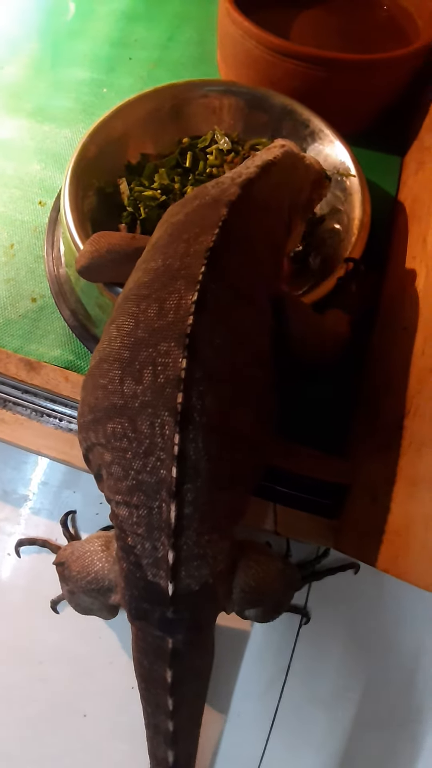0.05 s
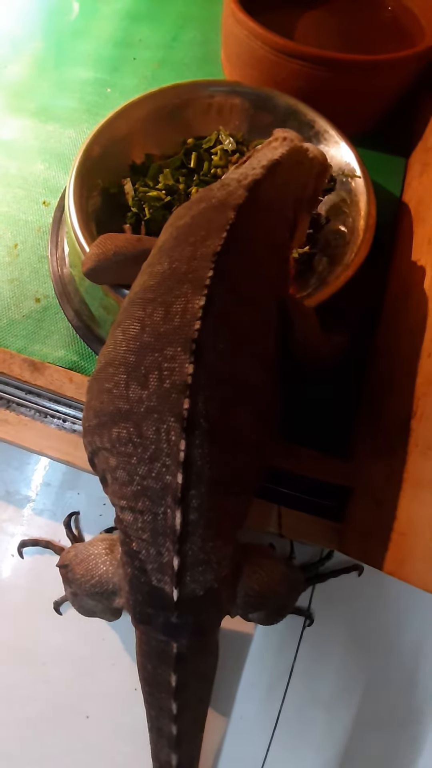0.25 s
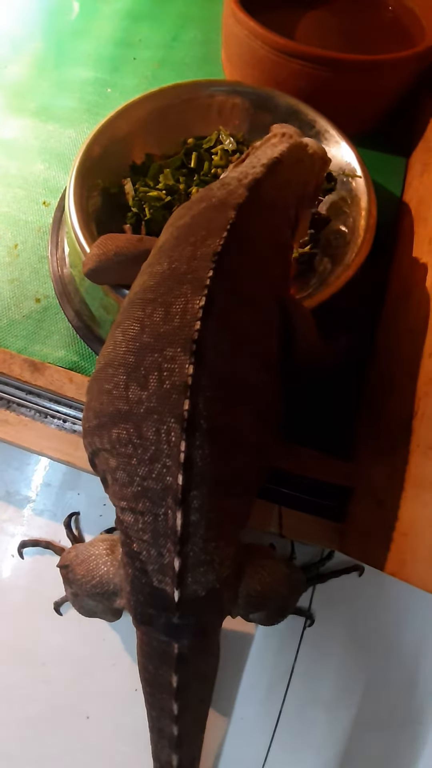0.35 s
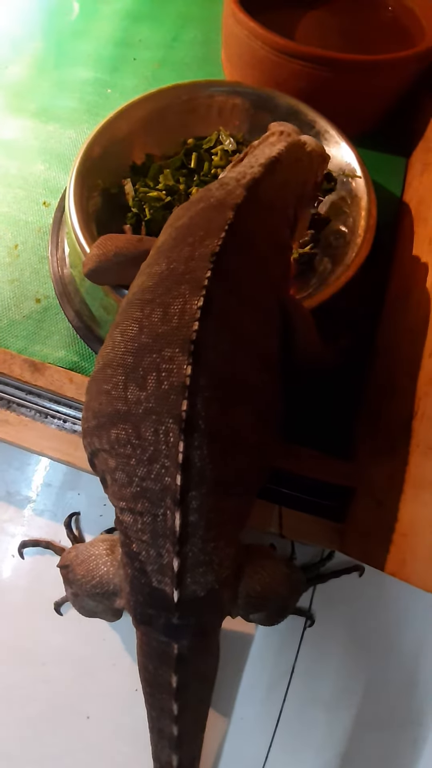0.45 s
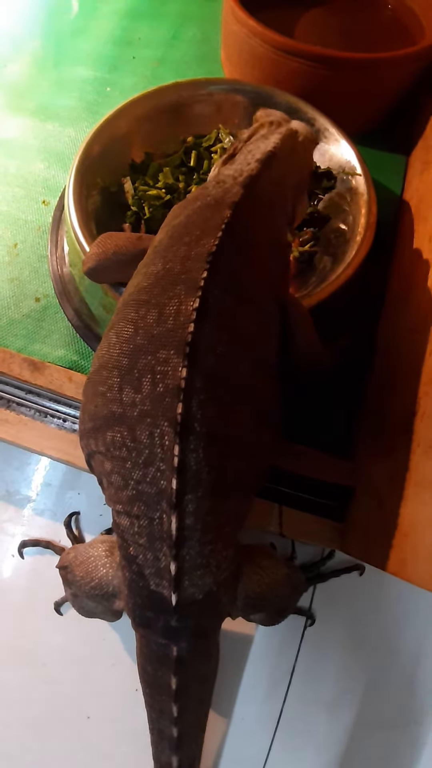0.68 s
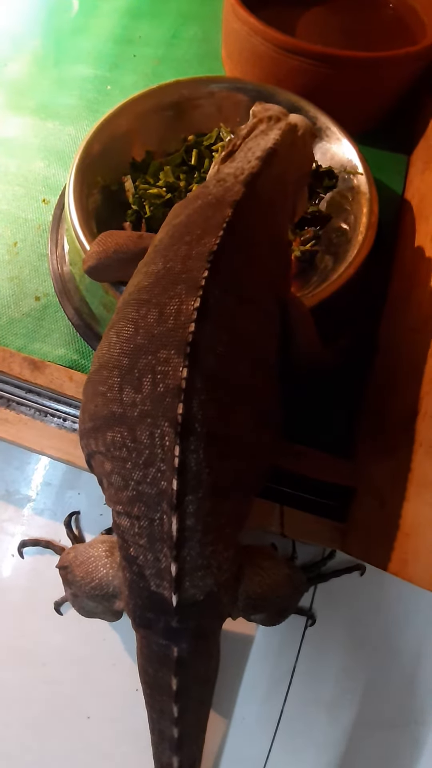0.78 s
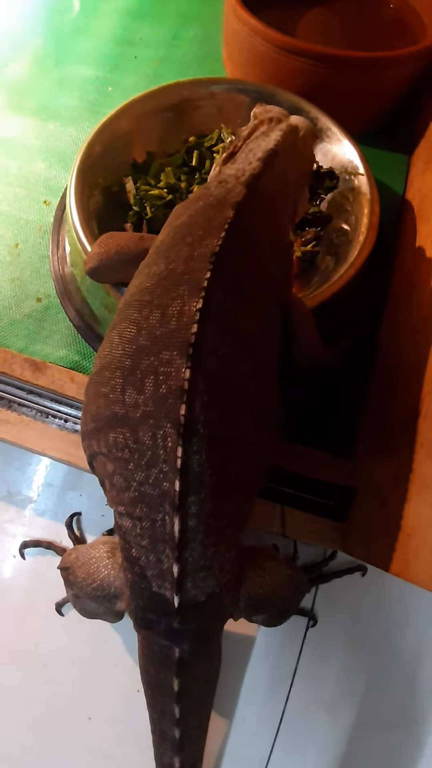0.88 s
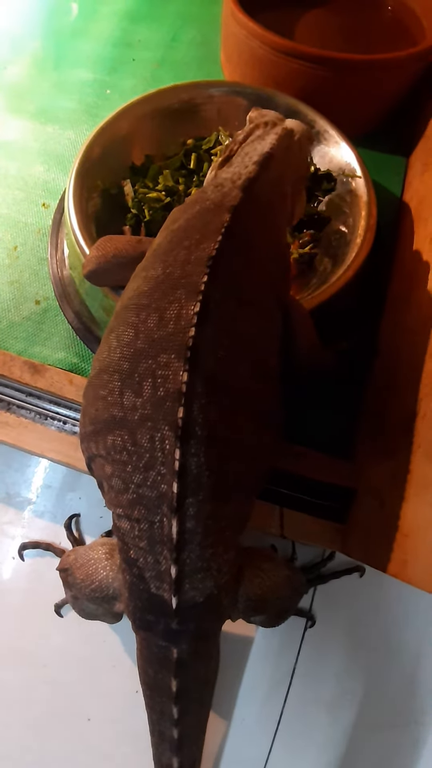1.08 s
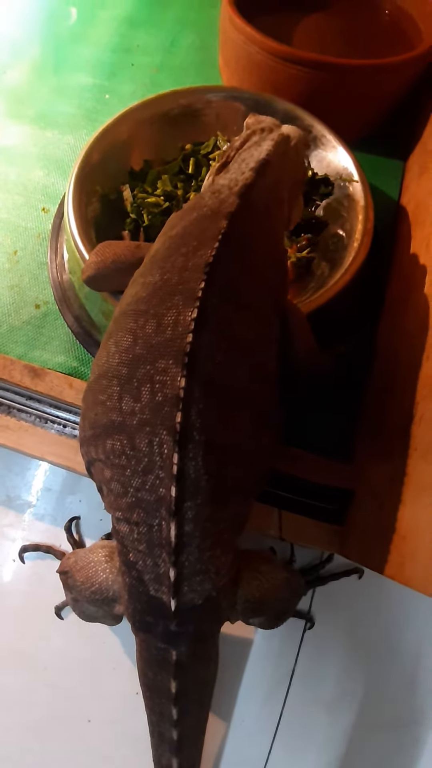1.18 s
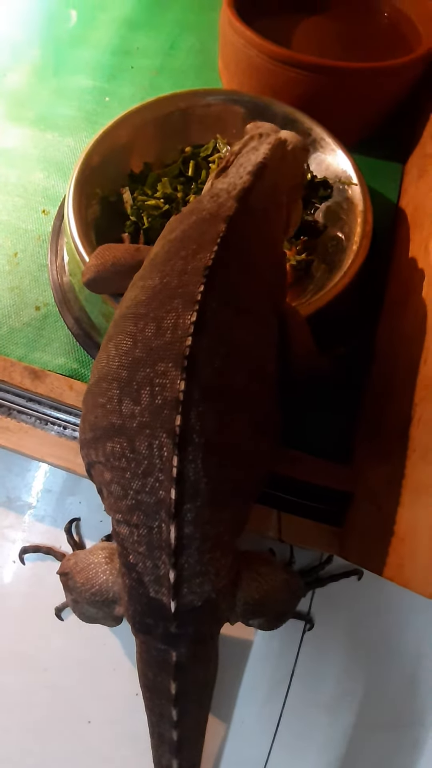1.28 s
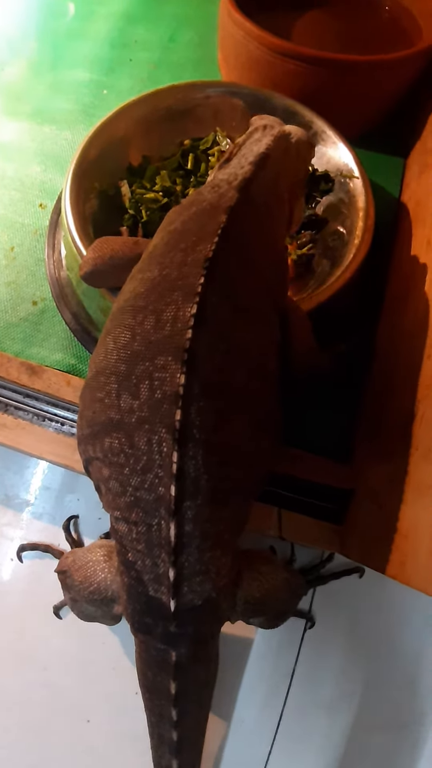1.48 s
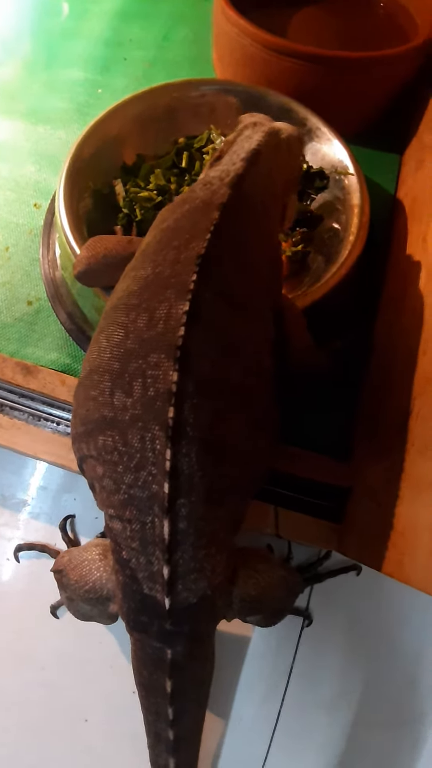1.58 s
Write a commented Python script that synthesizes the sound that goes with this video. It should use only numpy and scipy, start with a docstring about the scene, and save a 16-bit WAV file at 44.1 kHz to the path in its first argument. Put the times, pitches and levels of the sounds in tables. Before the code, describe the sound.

A lizard crunches leafy greens in a metal bowl, one dry bite in a quiet room.

```python
"""Iguana feeding from a steel bowl

Chopped greens, small quiet room. One bite swells as a tearing rustle and ends in two snaps
that ring the bowl; a bright rustle tail, a tick and soft chewing follow. Rustle, snaps and crunches
are showers of tiny fractures. Small clicks and knocks throughout, a thin high hiss at the start.
Behind them: room air, low hum, a dull drone, a faint far whine.
The right microphone hears much less treble than the left."""
import sys
import numpy as np
from scipy import signal
from scipy.fft import rfft, irfft, next_fast_len
from scipy.io import wavfile
from scipy.ndimage import uniform_filter1d

SR = 44100
rng = np.random.default_rng(int(sys.argv[2]) if len(sys.argv) > 2 else 0)


def generate_wav(signal):
    """Clip the signal to [-1, 1] and save it as 16-bit WAV at the path in sys.argv[1]."""
    frames = np.transpose(np.atleast_2d(signal))
    scaled = np.clip(frames, -1, 1) * 32767
    pcm = np.round(scaled).astype(np.int16)
    wavfile.write(sys.argv[1], SR, pcm)


N = 72765

# room air spectrum: f/Hz, gain/dB
AIR_COLOUR = [(25, -26), (39, -25.5), (48, -7), (85, 0), (130, 4), (220, -5), (270, -2.5), (480, -14.5),
              (900, -23.5), (1500, -25), (4000, -32), (7000, -34.5), (9800, -44), (13000, -29.5),
              (16000, -33.5)]
# room hums: f/Hz, half-width/oct, mid-scene level/dB
ROOM_HUMS = [(56.28, 0.21, -68), (164.6, 0.11, -69)]
# drone envelope: t/s, level/dB
DRONE_ENVELOPE = [(0, -54.5), (.1, -67.5), (.16, -72.5), (.5, -80.5), (.95, -77), (1.1, -68.5), (1.25, -72),
                  (1.43, -66.5), (1.55, -83), (1.65, -77.5)]
# small clicks and knocks, thin high hiss, bright rustle tail:
# t/s, level/dB, f/Hz, half-width/oct, decay/s, left-right/dB
SMALL_SOUNDS = [(.001, -59.5, 14100, 0.45, 0.022, 0), (0.0149, -51.5, 960, 0.17, 0.00099, 1),
                (0.014, -52, 421, 0.25, 0.0029, 9), (0.012, -65, 8200, .05, 0.079, 7),
                (.064, -65.5, 790, 0.36, 0.013, 10), (0.068, -79.5, 2370, .17, 0.15, -26),
                (.17, -66.5, 8100, .05, .004, -25), (.187, -65, 8400, .05, 0.0056, -2),
                (.203, -58, 380, .3, 0.0076, 11.5), (.211, -62, 1000, 0.47, 0.0022, 2.5),
                (0.216, -50, 8380, .09, .005, -1), (0.309, -51.5, 13440, .22, 0.058, 1.5),
                (0.37, -59.5, 12640, .3, 0.001053, 4), (0.378, -58.5, 2257, .35, 0.043, -3),
                (.38, -66.5, 4340, .25, 0.0119, -8), (0.525, -73, 12000, .5, .001, 3),
                (0.578, -57, 2110, 0.25, 0.0018, -2.5), (.579, -59.5, 1002, 0.56, .008, 3.5),
                (.595, -75, 8000, .6, 0.016, 10), (.69, -72.5, 7600, .12, 0.0247, 0),
                (0.989, -83, 7000, 0.52, .003, -1), (1.04, -76.5, 12000, 0.42, 0.0044, 0),
                (1.177, -75, 3800, .7, 0.0097, -2.5), (1.27, -67, 8000, 0.71, 0.014, -3),
                (1.32, -70, 7700, .15, 0.019, 2.5), (1.352, -63, 9500, .55, 0.0031, 0.5),
                (1.373, -70.5, 4500, 1.1, .005, -1)]
# tearing rustle: t/s, level/dB, lower edge f/Hz
TEAR_TRACK = [(.17, -84, 8000), (0.198, -70, 8000), (.218, -47.5, 7600), (0.231, -40, 3830),
              (0.243, -36.5, 2000), (.258, -36, 1495), (.272, -34.5, 1800), (.29, -49.5, 1200),
              (0.311, -59, 1200), (.34, -82.5, 1200)]
# rustle spectrum: f/Hz, gain/dB
RUSTLE_COLOUR = [(200, -18), (340, -7.5), (650, -15), (950, -7.5), (1500, -9), (2500, -6), (4300, -0.5),
                 (6000, -4.5), (7600, -4), (8550, 3.5), (9500, -18), (16000, -21.5)]
# stalk snaps: t/s, level/dB, decay/s
STALK_SNAPS = [(0.2452, -36.5, 0.0023), (0.2468, -30, 0.00058), (0.2616, -24.5, .002),
               (0.2637, -26.5, .003), (0.2909, -44.5, 0.0032), (0.305, -49.5, 0.00073)]
# snap spectrum: f/Hz, gain/dB
STALK_COLOUR = [(100, -42), (240, -24), (330, -8), (450, -8), (650, -14.5), (920, -7), (1600, -11),
                (2600, -9), (3400, -7), (4450, 2), (5900, -6.5), (7600, -3.5), (8600, 6), (9500, -14),
                (12500, -8.5), (16000, -17.5)]
# modes of the food-damped bowl: f/Hz, relative level/dB, t60/s
BOWL_MODES = [(312, -8, .12), (1410, -8, .14), (1880, -9, .3), (2540, -9, .3), (3100, -8, .12),
              (3830, -2, .13), (4190, -3, .13), (4470, 3, .07), (6640, -5, .1), (8675, 6, .07)]
# far whine: t/s, f/Hz, tone level/dB, hiss level/dB
WHINE_TRACK = [(.38, 755, -80.5, -85), (.42, 758.2, -76.5, -80), (.46, 749, -69, -80.5),
               (.485, 746.5, -84, -75), (0.531, 761, -69, -75.5), (.6, 734, -69.5, -70),
               (.73, 752, -76.5, -79.5), (0.771, 748, -92, -76), (0.849, 596, -74, -72),
               (.94, 620.5, -85, -73), (1.0, 618, -96, -89)]
# tick spectrum: f/Hz, gain/dB
CONTACT_COLOUR = [(600, -67.5), (2400, -36.5), (4400, -28.5), (6100, -29), (7500, -16), (10500, -19),
                  (12000, -5), (13300, 5.5), (15000, -10.5), (16500, -2.5)]
# chewing crunches: t/s, level/dB, decay/s
CHEW_CRUNCHES = [(.7746, -56, 0.00083), (0.785, -59.5, .005), (0.7908, -52, 0.00078),
                 (0.7951, -46.5, 0.0012), (.803, -55, 0.0042)]
# crunch spectrum: f/Hz, gain/dB
CHEW_COLOUR = [(150, -29), (300, -8.5), (550, -1), (900, -5), (1150, -4.5), (1550, 2.5), (2500, -12),
               (4000, -6.5), (5500, -6.5), (7500, -9), (9500, -27.5), (16000, -27)]
# right microphone relative to left: f/Hz, gain/dB
RIGHT_MIC_COLOUR = [(100, 2.5), (400, -1.5), (1300, 2.5), (2400, 2.5), (4400, 0.5), (6300, -11.5),
                    (8200, -25.5), (15000, -23)]

t = np.arange(N) / SR


def amp(db):
    return 10 ** (np.asarray(db) / 20)


def unit(x):
    """Scale to rms 1."""
    return x / np.sqrt(np.mean(x ** 2) + 1e-30)


def impulse_level(x, db):
    """Give a short sound the energy of 5 ms at this level."""
    return unit(x) * amp(db) * np.sqrt(.005 * SR / N)


def pan(left_right_db):
    return amp(np.array([[left_right_db], [-left_right_db]]) / 2)


def shape(x, gain_db):
    """Minimum-phase filter; gain_db is a function of octaves above 1 Hz."""
    size = 2 * next_fast_len(N)
    octave = np.log2(np.maximum(np.fft.rfftfreq(size, 1 / SR), 1))
    cepstrum = irfft(np.log(amp(gain_db(octave))))
    cepstrum[1:size // 2] *= 2
    cepstrum[size // 2 + 1:] = 0
    return irfft(rfft(x, size) * np.exp(rfft(cepstrum)))[..., :N]


def tint(x, colour):
    """Filter by (f/Hz, gain/dB) points."""
    hz, db = np.array(colour, float).T
    return shape(x, lambda octave: np.interp(octave, np.log2(hz), db))


def band(x, hz, half_width_oct):
    """One resonance with steep skirts."""
    return shape(x, lambda octave: -30 * np.log10(1 + ((octave - np.log2(hz)) / half_width_oct) ** 2 / 3))


def noise():
    return rng.standard_normal(N)


def wander(rate_hz):
    """Smooth random drift, rms 1."""
    hold = int(SR / rate_hz)
    steps = np.repeat(rng.standard_normal(N // hold + 1), hold)
    return unit(uniform_filter1d(steps, hold)[:N])


def fractures(per_s, scatter_db):
    """Random impulses of uneven size."""
    hits = rng.random(N) < per_s / SR
    return hits * np.sign(noise()) * amp(scatter_db * noise())


def burst(start_s, decay_s):
    """A first break, then a dying shower of fractures."""
    age_s = t - start_s
    shower = fractures(per_s=17000, scatter_db=.5) * (age_s >= 0) * np.exp(-np.abs(age_s) / decay_s)
    shower[np.searchsorted(age_s, 0)] = 1
    return shower


def background(air_db=-67, wide_above_hz=450, hum_fall_db_per_s=5):
    """Room air, near mono in the bass; ebbing low hums; a dull drone that comes and goes."""
    side = shape(noise(), lambda octave: -10 * np.log10(1 + (wide_above_hz / 2 ** octave) ** 2))
    spread = np.array([side, -side])
    air = unit(tint(noise() + spread, AIR_COLOUR)) * amp(air_db)
    hums = sum(unit(band(noise(), hz, width_oct)) * amp(db) for hz, width_oct, db in ROOM_HUMS)
    hums *= amp(-hum_fall_db_per_s * (t - t.mean()))
    drone = unit(band(noise() + spread, hz=371.5, half_width_oct=.18))
    drone *= amp(np.interp(t, *np.array(DRONE_ENVELOPE).T))
    return air + hums + drone


def small_sounds():
    """Small clicks and knocks, a thin high hiss, a bright rustle tail: one panned band burst each."""
    return sum(impulse_level(band(burst(start_s, decay_s), hz, width_oct), db) * pan(side_db)
               for start_s, db, hz, width_oct, decay_s, side_db in SMALL_SOUNDS)


def leaf_tear(edge_db_per_oct=22.5):
    """Leaf fibres break in a rustle that spreads down from the treble."""
    times_s, level_db, edge_hz = np.array(TEAR_TRACK).T
    edge_oct = np.interp(t, times_s, np.log2(edge_hz))
    fibres = unit(tint(fractures(per_s=3800, scatter_db=5.5), RUSTLE_COLOUR))
    bin_hz, frame_s, frames = signal.stft(fibres, SR, nperseg=256)
    below_edge_oct = np.maximum(np.interp(frame_s, t, edge_oct) - np.log2(bin_hz + 1)[:, None], 0)
    rustle = signal.istft(frames * amp(-edge_db_per_oct * below_edge_oct), SR)[1][:N]
    gate = (t > times_s[0]) * (t < times_s[-1])
    return rustle * amp(np.interp(t, times_s, level_db)) * gate


def stalk_snaps():
    """Stalks break in short, bright bursts."""
    return sum(impulse_level(tint(burst(start_s, decay_s), STALK_COLOUR), db)
               for start_s, db, decay_s in STALK_SNAPS)


def bowl_ring(bite, relative_db=-10.5):
    """The bite drives the steel bowl's damped modes."""
    ring = np.zeros(N)
    for hz, db, t60_s in BOWL_MODES:
        mode = np.sin(2 * np.pi * hz * t) * amp(-60 * t / t60_s)
        ring += amp(db) * unit(signal.fftconvolve(bite, mode)[:N])
    return unit(ring) * np.std(bite) * amp(relative_db)


def whine(waver_depth=.0074, blur_db=-3, fade_s=.02):
    """Thin, blurred far tone in hiss; sinks and turns hoarse as it ends."""
    times_s, hz, tone_db, hiss_db = np.array(WHINE_TRACK).T
    pitch_hz = np.interp(t, times_s, hz) * (1 + waver_depth * wander(rate_hz=38))
    phase = 2 * np.pi * np.cumsum(pitch_hz) / SR
    blur = amp(blur_db) * wander(rate_hz=60) * np.cos(phase)
    tone = unit(np.sin(phase) + blur) * pan(left_right_db=5)
    hiss = unit(band(np.array([noise(), noise()]), hz=680, half_width_oct=.16))
    gate = np.interp(t, [times_s[0] - fade_s, times_s[0], times_s[-1], times_s[-1] + fade_s], [0, 1, 1, 0])
    return gate * (tone * amp(np.interp(t, times_s, tone_db)) + hiss * amp(np.interp(t, times_s, hiss_db)))


def tick(start_s=.3796, level_db=-22.5):
    """One very short, very bright contact."""
    contact = signal.unit_impulse(N, round(start_s * SR))
    return impulse_level(tint(contact, CONTACT_COLOUR), level_db)


def crunches():
    """Chewed greens break in soft bursts."""
    return sum(impulse_level(tint(burst(start_s, decay_s), CHEW_COLOUR), db)
               for start_s, db, decay_s in CHEW_CRUNCHES)


def reflections(t60_s, treble_hz=6500, treble_t60_ratio=.55, onset_s=.002):
    """Diffuse room response of unit energy; the treble dies sooner."""
    hiss = noise()
    low = signal.sosfiltfilt(signal.butter(2, treble_hz, fs=SR, output="sos"), hiss)
    tail = low * amp(-60 * t / t60_s) + (hiss - low) * amp(-60 * t / (t60_s * treble_t60_ratio))
    return unit(tail * (1 - np.exp(-t / onset_s))) / np.sqrt(N)


def room(x, wet_db, wall_db=0, wall_decay_s=.0008, early_db=-2, late_db=-14, right_lag_s=.0003):
    """Per microphone: direct sound, scatter off the bowl wall, early reflections, soft tail."""
    channels = []
    for sound, lag_s in zip(x * np.ones((2, 1)), (0, right_lag_s)):
        wall = amp(wall_db) * unit(noise() * np.exp(-t / wall_decay_s)) / np.sqrt(N)
        near = np.sinc((t - lag_s) * SR) + wall
        far = amp(early_db) * reflections(t60_s=.16) + amp(late_db) * reflections(t60_s=.42)
        response = near / np.linalg.norm(near) + amp(wet_db) * far
        channels.append(signal.fftconvolve(sound, response)[:N])
    return np.array(channels)


def scene():
    """Feeding sounds in the room, duller on the right, over whine and background."""
    bite = leaf_tear() + stalk_snaps()
    feeding = room(bite + bowl_ring(bite), wet_db=-5)
    feeding += room(crunches() + small_sounds(), wet_db=-1)
    feeding += room(tick(), wet_db=-3, wall_db=-6)
    left, right = feeding
    return np.array([left, tint(right, RIGHT_MIC_COLOUR)]) + whine() + background()


def record(dry):
    """Band limit: 39 Hz to 16.2 kHz."""
    low_cut = signal.butter(8, 39, "high", fs=SR, output="sos")
    top_cut = signal.ellip(10, .2, 80, 16200, fs=SR, output="sos")
    return signal.sosfilt(top_cut, signal.sosfilt(low_cut, dry))


dry = scene()
out = record(dry)
generate_wav(out)
```